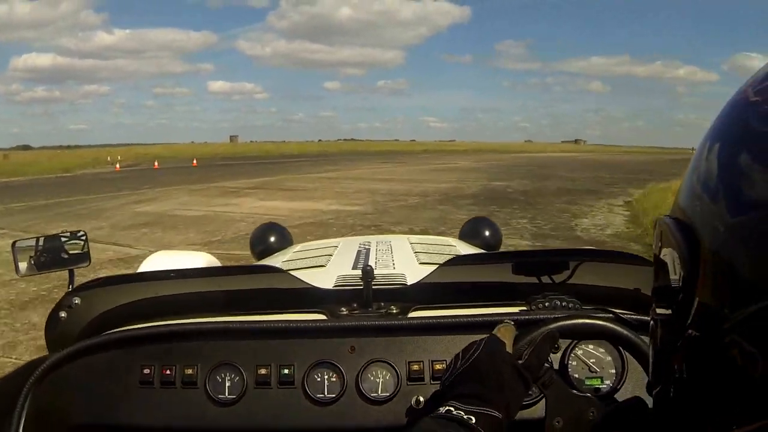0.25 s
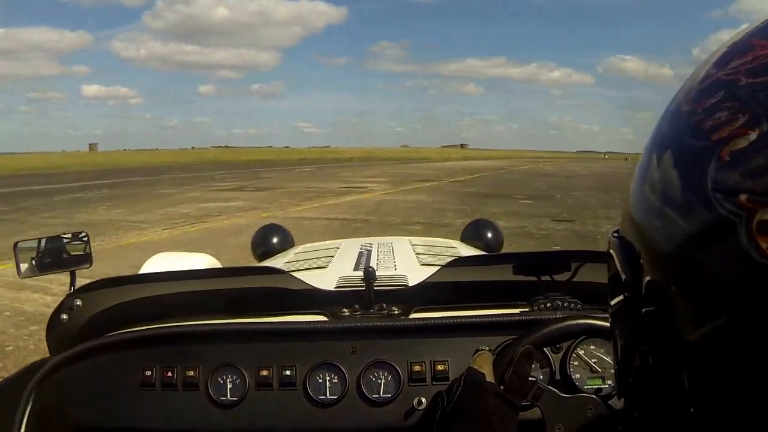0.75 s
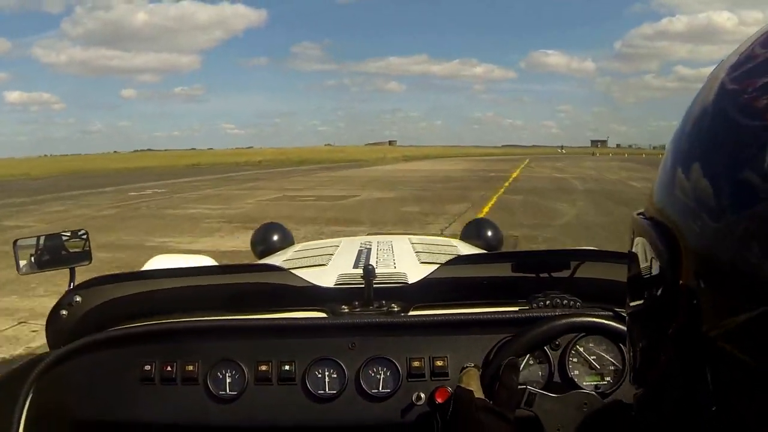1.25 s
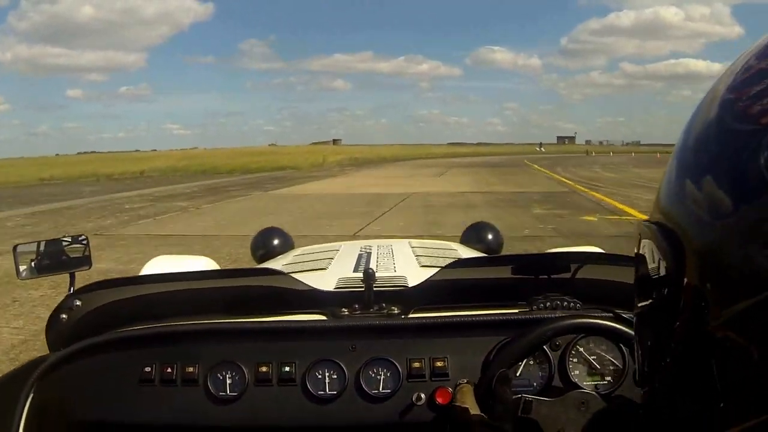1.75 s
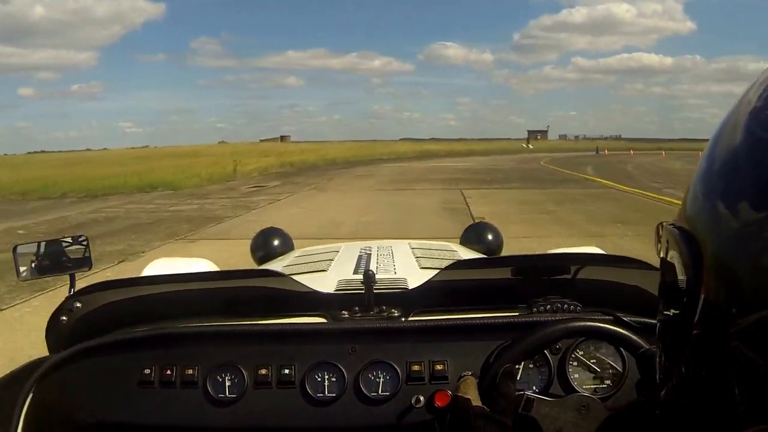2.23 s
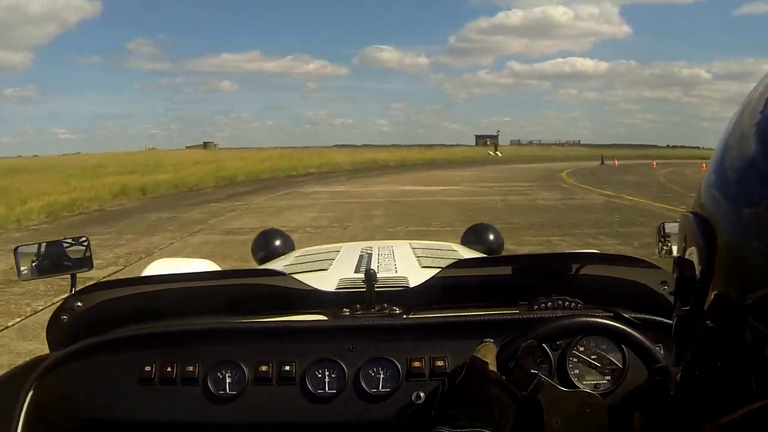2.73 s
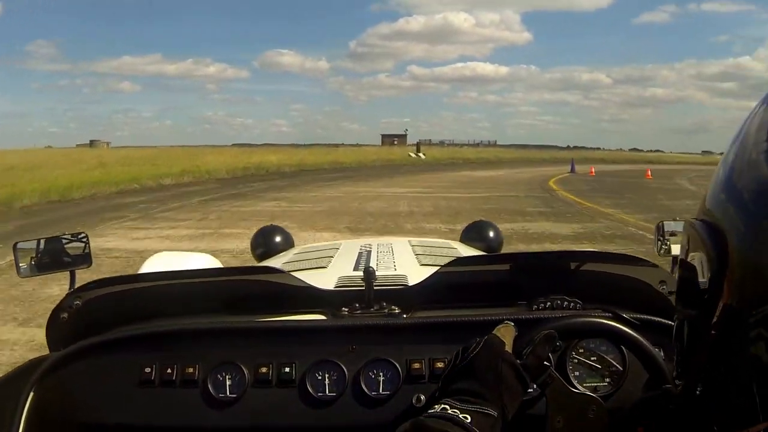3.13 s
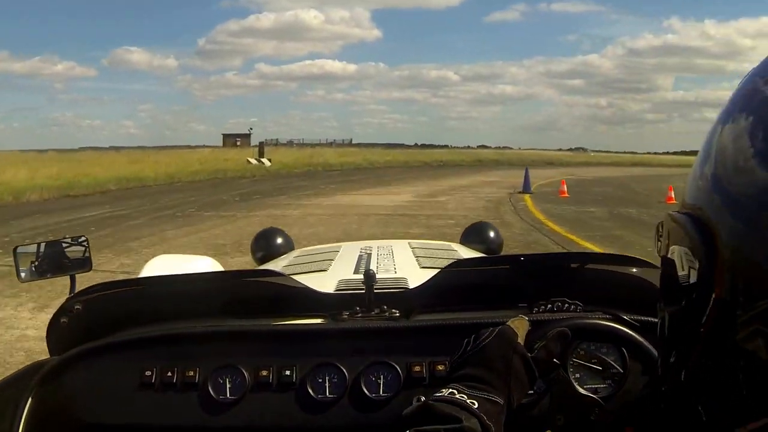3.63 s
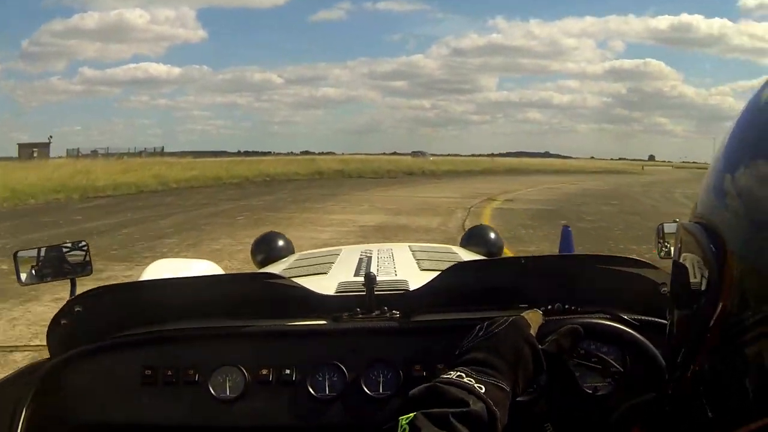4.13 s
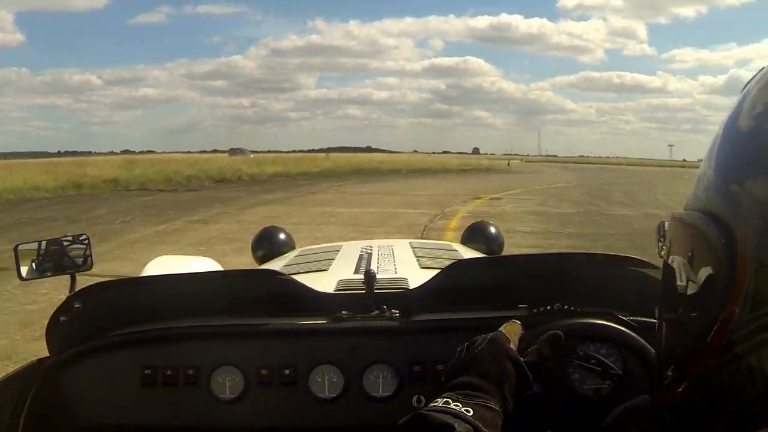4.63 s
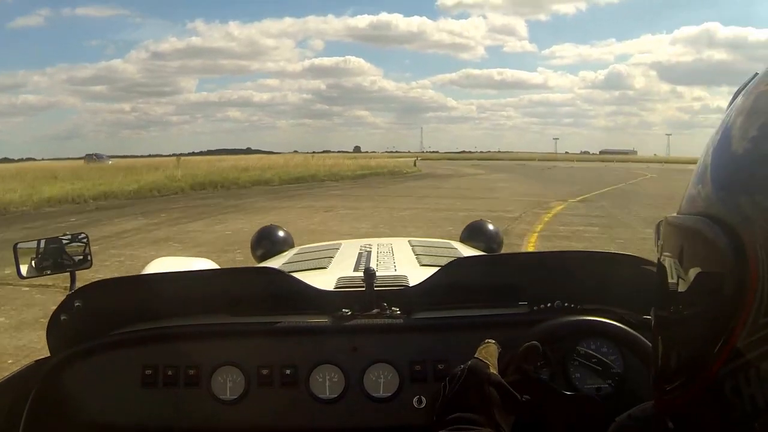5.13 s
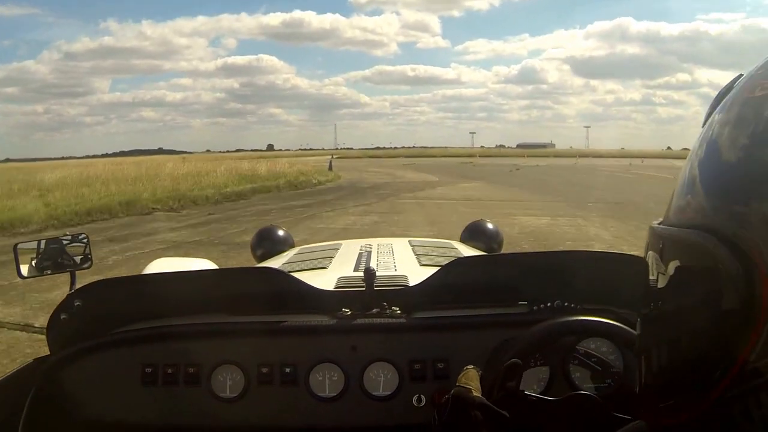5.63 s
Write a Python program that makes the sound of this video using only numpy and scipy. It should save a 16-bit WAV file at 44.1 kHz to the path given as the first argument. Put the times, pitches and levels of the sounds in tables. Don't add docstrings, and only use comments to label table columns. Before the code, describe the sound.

A low, buzzing engine drone and thin gear whine rise, sag and rise again, buried in deep wind buffeting, rattling and clipped jolts.

```python
import sys
import numpy as np
from scipy import signal
from scipy.fft import rfft, irfft
from scipy.io import wavfile
from scipy.ndimage import uniform_filter1d

SR = 44100
rng = np.random.default_rng(int(sys.argv[2]) if len(sys.argv) > 2 else 0)


def natural_amplitude(level_db):
    exponent = np.asarray(level_db, float) / 20
    return 10 ** exponent


def generate_wav(sig):
    pcm = np.round(np.clip(np.atleast_2d(sig).T, -1, 1) * 32767).astype(np.int16)
    wavfile.write(sys.argv[1], SR, pcm)


N = 259308
TIME = np.arange(N) / SR

# time_s, shaft_speed_hz, effort_db
ENGINE = [(0, 38.67, -32), (.45, 39.38, -28.5), (.62, 39.88, -22.5), (1.2, 41.28, -18.5),
          (1.55, 42.47, -20.5), (1.7, 43.68, -29), (1.82, 41.17, -30), (2.15, 39.1, -19.5),
          (2.3, 37.6, -22.5), (2.42, 35.81, -29), (2.95, 33.05, -24.5), (3.5, 31.16, -23),
          (4.2, 29.87, -36), (4.35, 30.55, -19), (4.9, 32.23, -22.5), (5.2, 34.14, -27.5),
          (5.55, 35.82, -21), (5.88, 37.44, -19.5)]
# multiple, level_db
LOW_ORDERS = [(1, -18), (1.5, 4.5), (2, -19.5)]
# multiple, level_db
FIRING_ORDERS = [(2.5, -20), (3, -10.5), (4, 1.5), (4.5, -29), (5, -9), (5.5, -39), (6, -12.5), (7, -12),
                 (8, -11)]
# centre_hz, width_hz, lift_db
FRAME_MODES = [(103, 77, 3.5), (129.5, 12, -15.5), (155, 28, 2.5), (205.5, 45, 11.5), (240.8, 10, 0),
               (312, 137, -10)]
# time_s, pitch_hz, level_db
GEAR_WHINE = [
    [(.45, 665, -42), (.62, 668, -30), (.7, 667, -38), (.8, 664, -32), (.95, 668, -33), (.99, 671, -26),
     (1.056, 677, -23), (1.11, 679, -28)],
    [(1.13, 680, -24), (1.2, 684, -23.5), (1.258, 687, -20.5), (1.3, 689, -26), (1.41, 695, -23),
     (1.52, 700, -27), (1.56, 702, -27)],
    [(1.605, 703, -31), (1.64, 704, -32)],
    [(4.3, 508, -40), (4.46, 517, -31), (4.58, 522, -27.5), (4.63, 524, -32), (4.74, 528, -27),
     (4.83, 534, -26)],
    [(4.835, 534, -28), (4.97, 541, -22.5), (5.08, 547, -22), (5.254, 567, -18.5), (5.45, 585, -22.5),
     (5.6, 599, -21.5), (5.73, 611, -20.5), (5.77, 614, -27), (5.88, 622, -28)],
]
# multiple, width_hz, level_db
MESH_OVERTONES = [(2, 150, -24), (3, 120, -26.5)]
# centre_hz, width_hz, lift_db
MESH_PANELS = [(1630, 150, 16.5), (1110, 150, 11)]
# time_s, pitch_hz, level_db
BOOM = [(0, 42.3, -12.5), (.44, 43.45, -9), (.66, 41.8, -14), (.78, 41.46, -20.5), (1.1, 41.6, -23),
        (1.52, 40.64, -7.5), (1.7, 41, -15.5), (2.08, 40.76, -7.5), (2.27, 40.98, -26), (2.38, 41.27, -7.5),
        (2.9, 41, -16.5), (3.2, 44.5, -9.5), (3.46, 45.32, -12), (4.15, 42.84, -9), (4.4, 43.01, -21),
        (4.9, 43.57, -14), (5.4, 42.29, -24), (5.88, 43.34, -14.5)]
# centre_hz, width_hz, level_db
BUFFET = [(41, 5.5, -19), (58.3, 19, -23), (25.9, 6.7, -49), (89, 95, -36.5)]
# time_s, over_mean_db
ROUGHNESS = [(0, 2.5), (.45, 1), (.75, 0), (1.05, 2), (1.3, 1.5), (1.8, -2), (2.1, 1.5), (2.45, 0.5),
             (2.95, 0), (3.25, 1), (3.7, 4), (4.22, 0), (4.38, 8), (4.7, 3), (4.9, 2), (5.1, 2.5),
             (5.45, 2), (5.88, 2.5)]
# peak_s, lift_db, rise_s, extra_frame_thump_db
JOLTS = [(0.137, 9.5, 0.014, 2), (0.221, 2.5, 0.01, 4.5), (0.401, 3, 0.044, -8.5), (.665, 2, 0.054, 3.5),
         (0.851, 4, 0.044, -2.5), (1.272, 5.5, .04, -7), (1.86, 1, 0.045, 2.5), (2.22, 7.5, 0.1, -1.5),
         (2.29, 9.5, 0.065, -1.5), (2.345, 11, .05, -2), (2.459, -1, .05, 4.5), (.73, 0, 0.036, 4),
         (3.9, 0.5, .04, 4), (4.63, 0.5, 0.044, 4), (2.63, 6.5, .045, 11), (2.8, 4.5, 0.086, 1),
         (3.019, 6, 0.097, -0.5), (3.1, 3, 0.016, 4.5), (3.4, 4.5, 0.041, -3.5), (3.49, 2.5, 0.11, 1),
         (3.753, 3.5, 0.054, 3.5), (3.98, 6, .08, 2.5), (4.1, 0, 0.072, -3), (4.569, 5.5, 0.051, -1),
         (4.66, 2, 0.042, -5), (4.72, 5.5, .04, -3.5), (4.831, 6, 0.031, 1), (4.999, 6.5, 0.045, 1.5),
         (5.04, 8.5, 0.014, 3), (5.261, 5, 0.083, -4), (5.74, 5.5, 0.085, -7.5)]
# pitch_hz, density_db_per_hz
SHAKE_COLOUR = [(70, -16.5), (112, -22), (205, -12.5), (330, -33), (444, -36.5), (620, -29), (797, -36),
                (1400, -36.5), (2150, -27), (2600, -48.5), (3500, -50.5), (5000, -64), (7200, -82),
                (11500, -95), (15500, -100)]
# centre_hz, width_hz, lift_db
CASE_MODES = [(193.8, 28, 12), (273.5, 17, 12.5), (393.3, 26, 7.5), (551.5, 85, 7), (699, 68, 8),
              (903, 55, 8.5), (1073, 46, 5), (1699, 230, 12), (1965, 30, 5.5), (2150, 230, 9),
              (2780, 190, 4.5), (3190, 67, 4), (3620, 51, 2.5), (4466, 130, 9), (4860, 400, 2.5),
              (6400, 1300, 9)]
PART_BORDERS_HZ = [350, 1350, 2550]
# rest_db, share_of_roughness, share_of_jolts
SHAKEN_PARTS = [
    (-28.5, 1.2, 1.12),
    (-34, 1.13, 0.98),
    (-41, 1.4, 0.97),
    (-51.5, 0.59, 0.85),
]
# time_s, peak_db
KNOCKS = [(1.5135, -17), (1.5372, -18.5), (1.5852, -20), (1.6082, -21)]
# start_s, length_s, level_db, first_hz, last_hz
SINGING = [(0, 0.49, -39, 2147, 2138), (0.548, 0.94, -38.5, 2142, 2138), (2.12, 0.21, -30, 2150, 2084),
           (2.439, 0.17, -35.5, 2180, 2142), (3.499, .48, -31, 2136, 2084), (3.2, 0.27, -41.5, 2120, 2143),
           (4.321, 0.422, -29, 2127, 2136), (4.734, 0.31, -36, 2175, 2229), (5.441, 0.39, -33, 2198, 2168),
           (0.542, 0.94, -40, 1990, 1932), (2.939, .2, -37, 1990, 1960), (3.669, 0.12, -32.5, 1732, 1723),
           (4.402, .55, -31, 1965, 1980), (5.438, 0.33, -42, 1936, 2025),
           (4.3, .6, -51, 3260, 3240), (5.45, .38, -53, 3250, 3240), (3.8, .32, -54, 3300, 3220),
           (2.0, .38, -56, 4420, 4400), (4.3, .55, -58, 4440, 4420), (5.45, .4, -59, 4420, 4450),
           (3.8, .4, -60, 4450, 4400), (2.5, 1.2, -60, 3900, 3850), (4.55, .3, -59, 3930, 3930),
           (5.1, .25, -54, 3700, 3680), (4.3, .3, -63, 5350, 5350), (5.45, .4, -63, 5330, 5350),
           (2.62, .4, -39, 880, 900), (3.2, .5, -38, 900, 905), (3.85, .25, -39, 920, 950),
           (2.17, .15, -33, 920, 915), (2.72, .1, -31, 555, 550), (2.92, .13, -32, 540, 530),
           (3.68, .08, -31, 620, 630), (4.27, .48, -27, 2155, 2140)]
# time_s, click_db, depth_db
GAIN_JUMPS = [(0.112, -47, 1.2), (0.5327, -46.5, 3), (0.637, -57, -2), (0.6805, -46, 8.5),
              (0.8456, -51, 2.5), (1.172, -49, -0.8), (1.302, -50, 1), (1.4461, -51, 0.5),
              (1.927, -49.5, 2.5), (2.385, -43, 3), (2.5284, -52.5, 1), (2.6483, -54.5, 1),
              (2.7857, -49.5, 0), (2.8143, -45, 1), (3.1042, -51, 0.5), (3.1594, -51, -2),
              (3.463, -54.5, 0.3), (3.497, -53, 5), (3.7516, -46.5, 2.5), (3.7982, -51, 6),
              (3.9121, -54, -2.3), (3.9851, -48.5, -3), (4.0802, -50.5, 0), (4.122, -56.5, 4.5),
              (4.2129, -51.5, 5), (4.527, -53, 0.8), (4.7274, -46.5, 2), (4.8452, -51.5, 1.3),
              (5.035, -50.5, -1.5), (5.054, -52, 6), (5.418, -54, 3.5)]


def in_time(rows):
    s, *columns = np.transpose(rows)
    return [np.interp(TIME, s, column) for column in columns]


def rms_one(x):
    return x / np.sqrt(np.mean(x ** 2) + 1e-20)


def drift(rate_hz):
    r = np.exp(-80 * np.pi * rate_hz / SR)
    chance = rng.standard_normal(N // 40 + 2002)
    slow = signal.lfilter([1], [1, -2 * r, r * r], chance)[2000:]
    return np.interp(np.arange(N) / 40, np.arange(len(slow)), rms_one(slow - slow.mean()))


def lift_db(modes, hz):
    return sum(db / (1 + (2 * (hz - centre) / width) ** 2) for centre, width, db in modes)


def resonate(x, hz, width_hz):
    r = np.exp(-np.pi * width_hz / SR)
    top = np.array([1, 0, -1]) * (1 - r * r) / 2
    return signal.lfilter(top, [1, -2 * r * np.cos(2 * np.pi * hz / SR), r * r], x)


def stack(hz, orders, modes, flutter_db, wander, rate_hz):
    phase = 2 * np.pi * np.cumsum(hz) / SR
    out = 0
    for multiple, db in orders:
        level = natural_amplitude(db + lift_db(modes, multiple * hz) + flutter_db * drift(rate_hz))
        out = out + np.sqrt(2) * level * np.sin(multiple * phase + wander * drift(rate_hz))
    return out


def whistle(hz, width_hz, steady=0.):
    envelope = steady + drift(width_hz) + 1j * drift(width_hz)
    return rms_one(np.real(envelope * np.exp(2j * np.pi * np.cumsum(hz) / SR)))


def shaking():
    s, db, rise_s, thump_db = np.array(JOLTS).T[:, :, None]
    coarse = TIME[::32]
    late = (coarse - s) / rise_s
    shape = np.exp(-np.where(late < 0, late, late / .35) ** 2)
    jolt_db = np.interp(TIME, coarse, (db * shape).sum(axis=0))
    frame_db = np.interp(TIME, coarse, (thump_db * shape).sum(axis=0))
    return in_time(ROUGHNESS)[0], jolt_db, frame_db


def engine():
    speed_hz, effort_db = in_time(ENGINE)

    def comb(orders, modes):
        return stack(speed_hz, orders, modes, flutter_db=1.5, wander=.3, rate_hz=4)

    edge_db = 1.5 - 0.41 * (speed_hz - speed_hz.mean())
    firing = comb(FIRING_ORDERS[:4], FRAME_MODES) + natural_amplitude(edge_db) * comb(FIRING_ORDERS[4:], FRAME_MODES)
    low_db = -27 + 0.29 * (effort_db - effort_db.mean())
    return natural_amplitude(effort_db - 5.5) * firing + natural_amplitude(low_db) * comb(LOW_ORDERS, [])


def gears():
    speed_hz = in_time(ENGINE)[0]
    runout = .3 * np.sin(2 * np.pi * np.cumsum(speed_hz) / SR + drift(3.8))
    out = 0
    for rows in GEAR_WHINE:
        hz, db = in_time(rows)
        edge = np.minimum(TIME - rows[0][0], rows[-1][0] + .02 - TIME)
        loaded = np.clip(edge / .02, 0, 1)
        tone = stack(hz, [(1, 0)], [], flutter_db=1.8, wander=.45, rate_hz=22) * (1 + runout)
        overtones = 0
        for multiple, width_hz, level_db in MESH_OVERTONES:
            level = natural_amplitude(level_db + lift_db(MESH_PANELS, multiple * hz))
            overtones = overtones + level * whistle(multiple * hz, width_hz)
        out = out + loaded * natural_amplitude(db) * (tone + overtones)
    return out


def mount():
    hz, db = in_time(BOOM)
    swing = natural_amplitude(db - 0.5) * stack(hz, [(1, 0)], [], flutter_db=1.8, wander=.35, rate_hz=4.3)
    _, jolt_db, thump_db = shaking()
    pushes = 0
    for centre_hz, width_hz, level_db in BUFFET:
        gust = resonate(rng.standard_normal(N), centre_hz, width_hz)
        pushes = pushes + natural_amplitude(level_db) * rms_one(resonate(gust, centre_hz, width_hz))
    return swing + natural_amplitude(0.64 * (jolt_db + thump_db)) * pushes


def case(boom, patchy_db, rattle):
    hz = np.maximum(np.fft.rfftfreq(N, 1 / SR), 1)
    colour_hz, colour_db = np.transpose(SHAKE_COLOUR)
    colour = natural_amplitude(np.interp(np.log(hz), np.log(colour_hz), colour_db) + lift_db(CASE_MODES, hz))
    noise = rfft(rng.standard_normal(N)) * colour
    rough_db, jolt_db, thump_db = shaking()
    levels = [db + a * rough_db + b * jolt_db for db, a, b in SHAKEN_PARTS]
    levels[0] = levels[0] + thump_db
    together = drift(62.0)
    parts = np.zeros((len(levels), N))
    for centre_hz in 70 * 2 ** np.arange(0, 8.1, .5):
        share = np.sqrt(np.clip(1 - np.abs(2 * np.log2(hz / centre_hz)), 0, 1))
        patches = together * (centre_hz > PART_BORDERS_HZ[0]) + 2.3 * drift(60.0)
        part = np.searchsorted(PART_BORDERS_HZ, centre_hz)
        parts[part] += irfft(noise * share, N) * natural_amplitude(patchy_db * patches)
    shaken = sum(natural_amplitude(db) * rms_one(part) for db, part in zip(levels, parts))
    return shaken * (1 + rattle * (rms_one(boom) ** 2 - 1))


def knocks():
    clicks = np.zeros(N)
    for s, db in KNOCKS:
        clicks[round(s * SR) + np.array([0, 38, 70])] += natural_amplitude(db + 22) * np.array([.6, -1, .4])

    def twice(hz, width_hz):
        return resonate(resonate(clicks, hz, width_hz), hz, width_hz)

    return natural_amplitude(7) * twice(1200, 700) + natural_amplitude(-21) * twice(3100, 1200) + natural_amplitude(-40) * twice(5600, 2000)


def seam():
    coasting = (TIME > 1.95) & (TIME < 4.2)
    high_db = -72 + 5 * coasting + .9 * shaking()[1]
    out = natural_amplitude(high_db) * whistle(5320 + 0 * TIME, 90.0)
    flutter = natural_amplitude(1 * drift(4.0) - 4.0)
    for s, length, db, first_hz, last_hz in SINGING:
        gate = np.clip(np.minimum(TIME - s, s + length - TIME) / 0.034 + .5, 0, 1)
        glide_hz = np.interp(TIME, [s, s + length], [first_hz, last_hz])
        out = out + natural_amplitude(db) * gate * flutter * whistle(glide_hz, 20.0, steady=1.3)
    return out


def air():
    band = signal.butter(2, [6500, 12500], "band", fs=SR, output="sos")
    hiss = signal.sosfilt(band, rng.standard_normal(N))
    speed_hz = in_time(ENGINE)[0]
    rough_db, jolt_db, _ = shaking()
    level_db = -75.5 + 0.9 * (speed_hz - speed_hz.mean()) + 0.89 * (rough_db + 0.94 * jolt_db)
    gusts_db = 1.5 * drift(18.0) + 2.9 * drift(90.0)
    return natural_amplitude(level_db + gusts_db) * rms_one(hiss)


def scene():
    boom = mount()
    shaken = case(boom, patchy_db=1.0, rattle=0.11)
    return (engine() + gears() + boom + shaken + knocks() + seam() + air())[None]


def gain_clicks():
    jumps = np.zeros(N)
    strays_per_s = 13
    chances = rng.random((int(strays_per_s * N / SR), 2))
    stray = [(.003 + (N / SR - .01) * when, -57.5 + 6 * (size - .5), 0) for when, size in chances]
    for s, db, _ in GAIN_JUMPS + stray:
        chatter = rng.standard_normal(90)
        jumps[round(s * SR) - 45:][:90] += natural_amplitude(db + 12.5) * chatter * np.hanning(90)
    jumps = signal.sosfilt(signal.butter(1, 9000, fs=SR, output="sos"), jumps)
    return signal.sosfilt(signal.butter(1, [2500, 6000], "band", fs=SR, output="sos"), jumps)


def gain_dips_db(recover_s):
    drops = np.zeros(N)
    s, _, depth_db = np.transpose(GAIN_JUMPS)
    drops[np.round(s * SR).astype(int)] = -np.abs(depth_db)
    dips = signal.lfilter([1], [1, -np.exp(-1 / (recover_s * SR))], drops)
    return uniform_filter1d(dips, size=88)


def roll_off(x):
    return signal.sosfilt(signal.butter(12, 15700, fs=SR, output="sos"), x)


def record(dry):
    limit_db, release_db_per_s, attack_s = -5.5, 39.5, .0001
    level_db = 20 * np.log10(np.abs(dry) + 1e-9)
    climb_db = release_db_per_s * TIME
    held_db = np.maximum.accumulate(level_db + climb_db, axis=1) - climb_db
    cut_db = .9 * np.minimum(limit_db - held_db, 0)
    r = np.exp(-1 / (attack_s * SR))
    gain_db = 1.5 + gain_dips_db(recover_s=.06) + signal.lfilter([1 - r], [1, -r], cut_db)
    held = dry * natural_amplitude(gain_db) + gain_clicks()
    treble = signal.sosfiltfilt(signal.butter(8, 11900, "high", fs=SR, output="sos"), held)
    mix = held - .4 * treble
    return roll_off(mix)


dry = scene()
out = record(dry)
generate_wav(out)
```